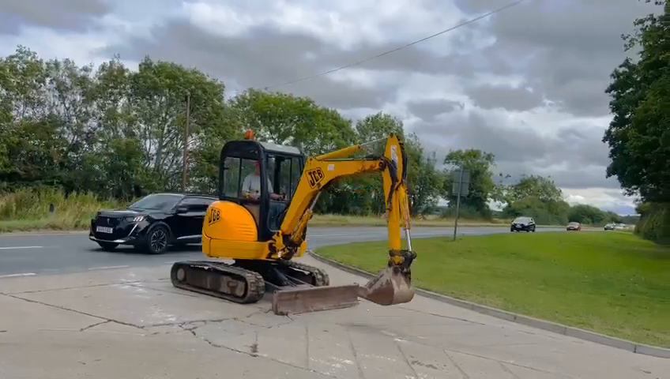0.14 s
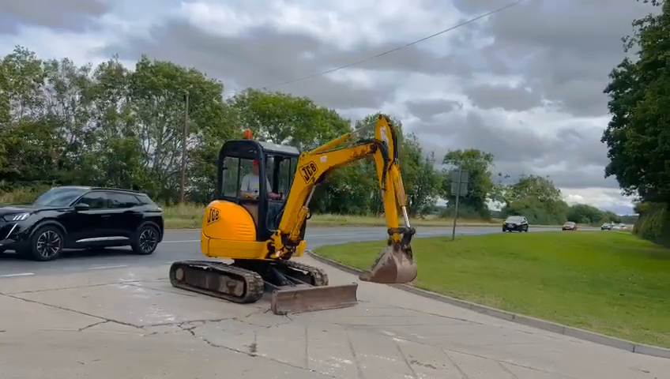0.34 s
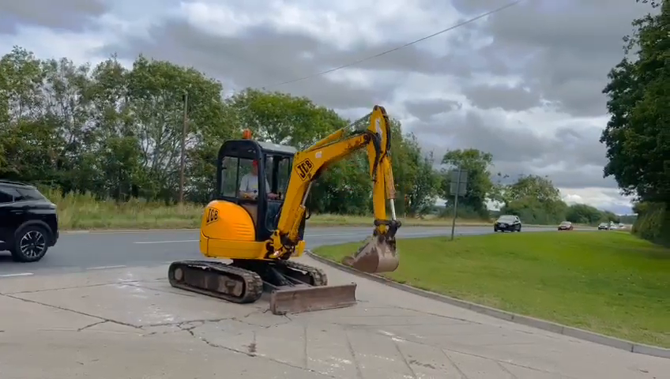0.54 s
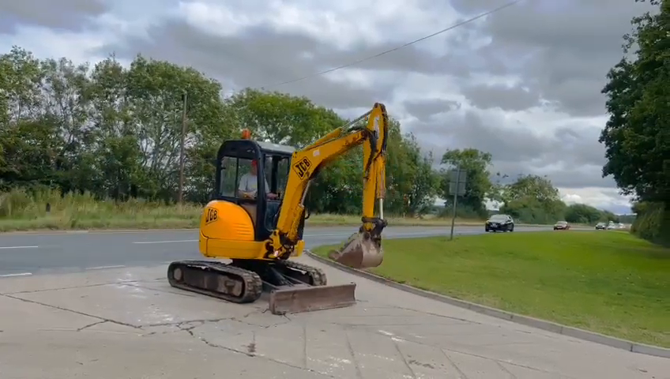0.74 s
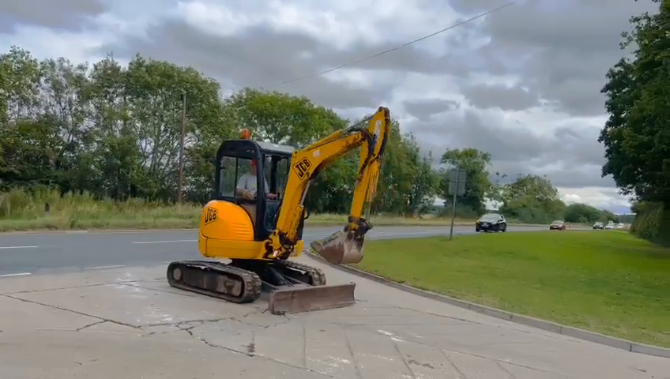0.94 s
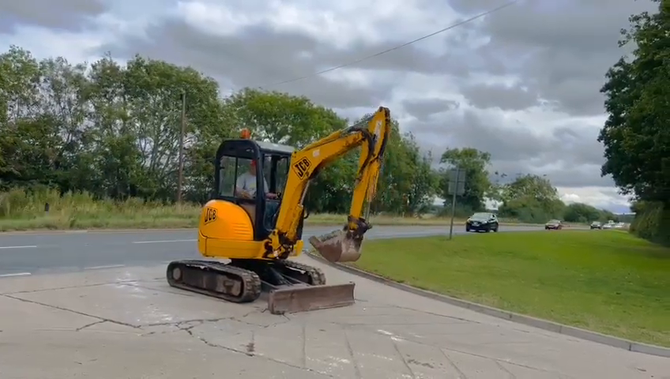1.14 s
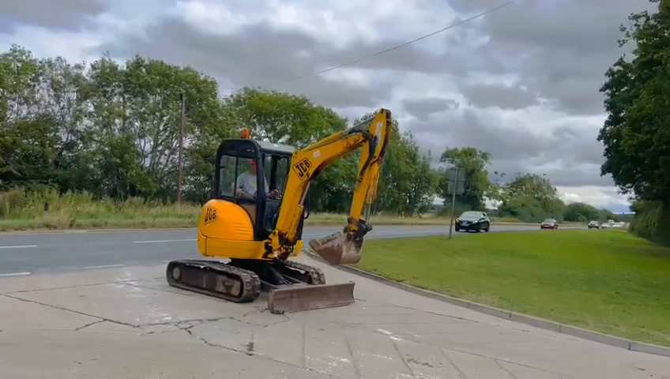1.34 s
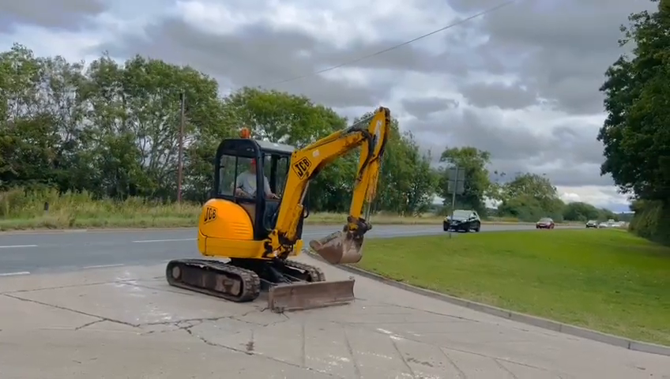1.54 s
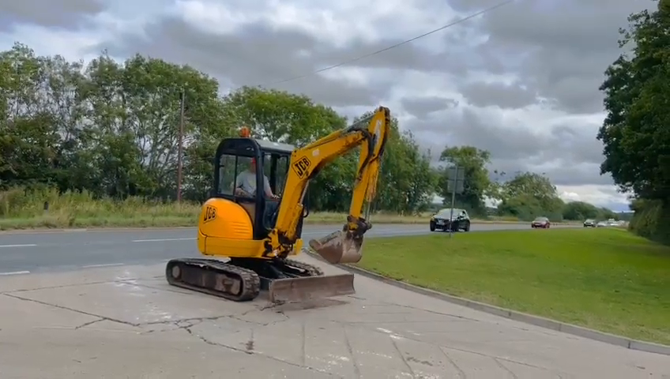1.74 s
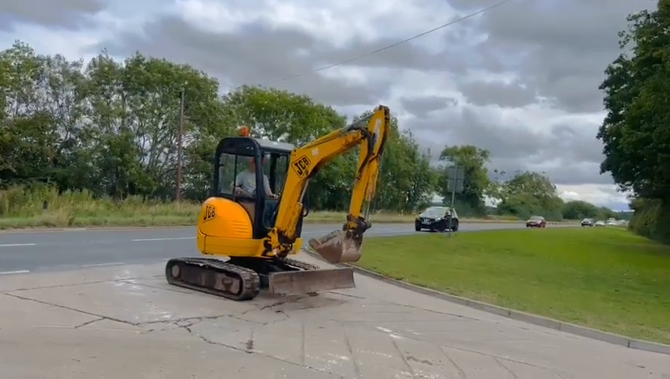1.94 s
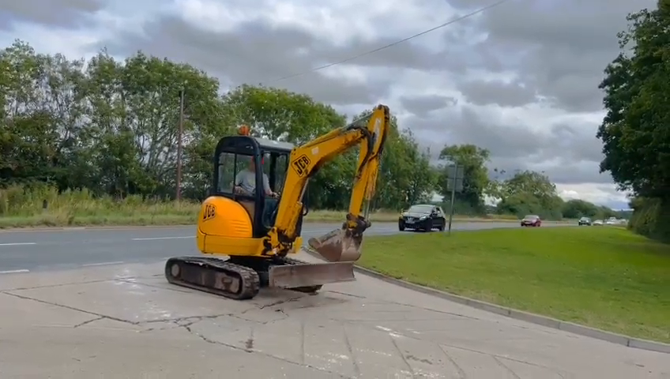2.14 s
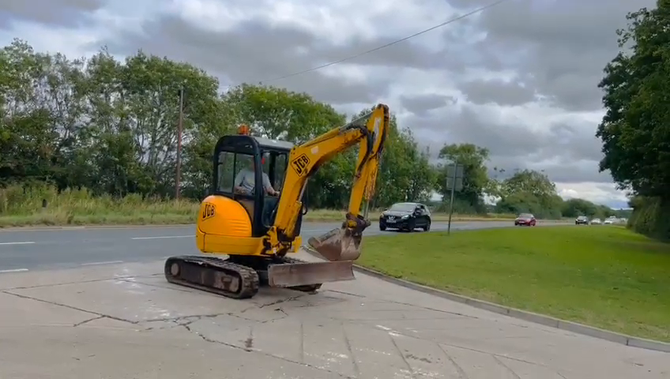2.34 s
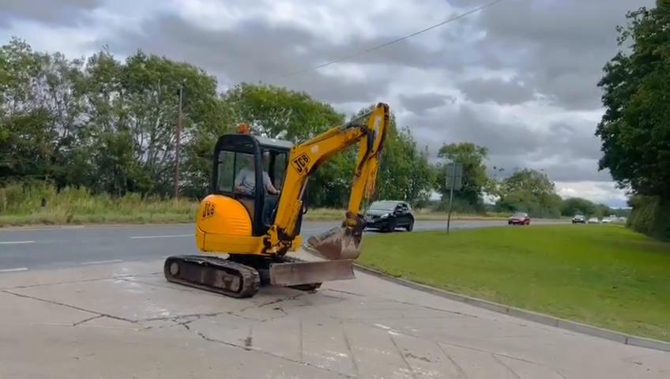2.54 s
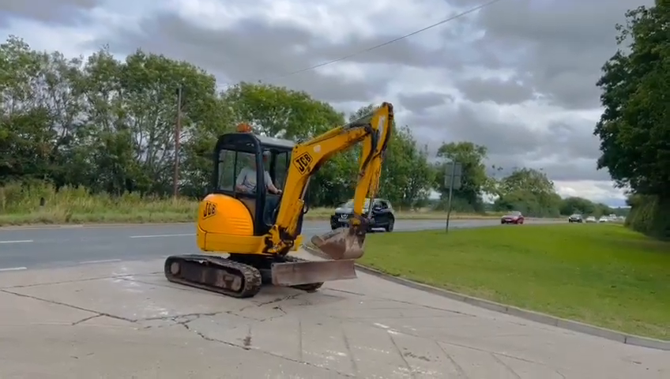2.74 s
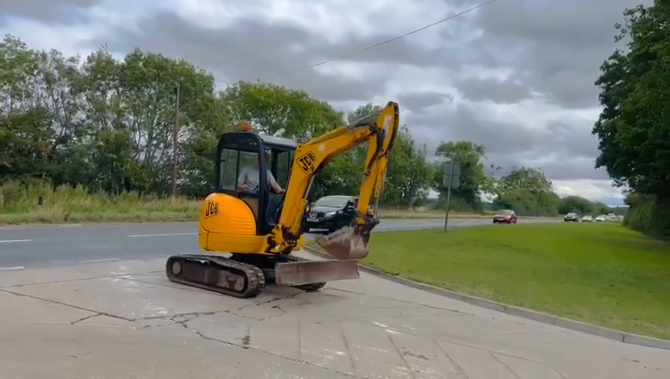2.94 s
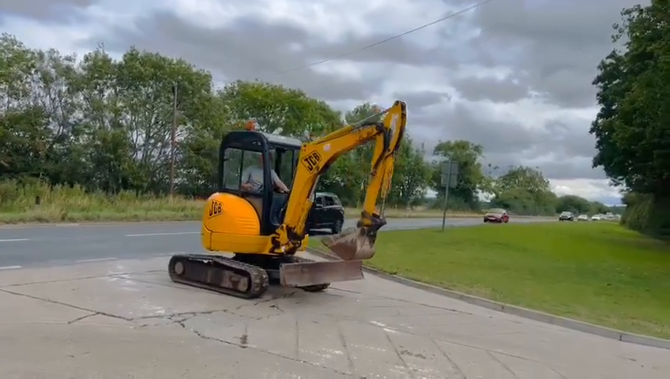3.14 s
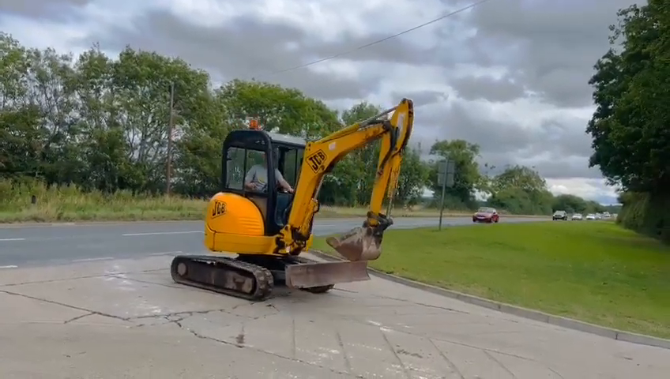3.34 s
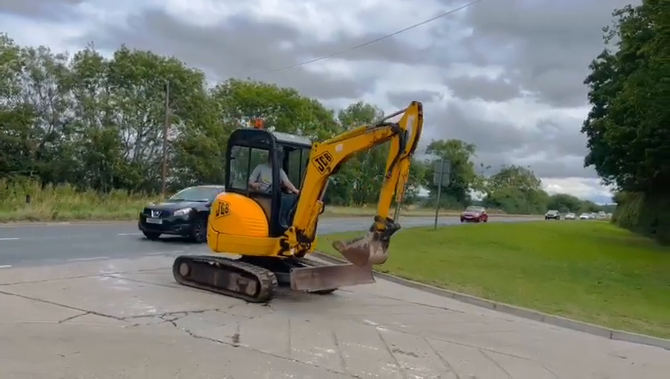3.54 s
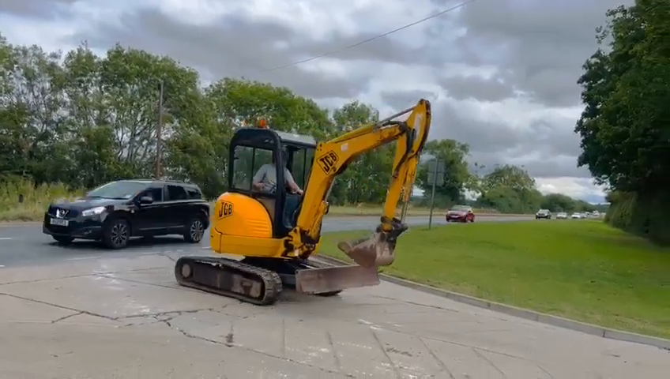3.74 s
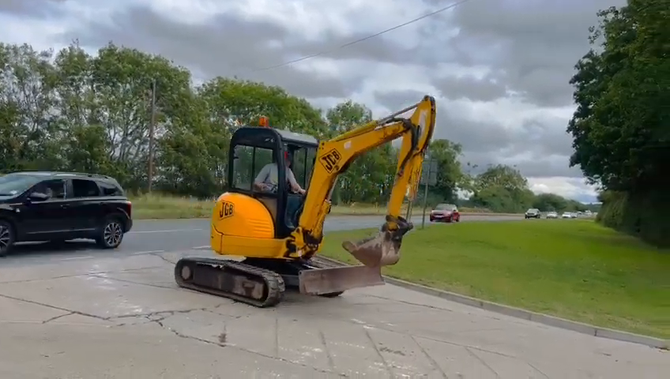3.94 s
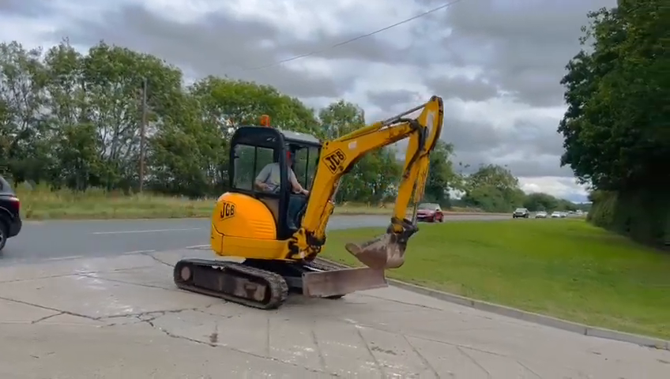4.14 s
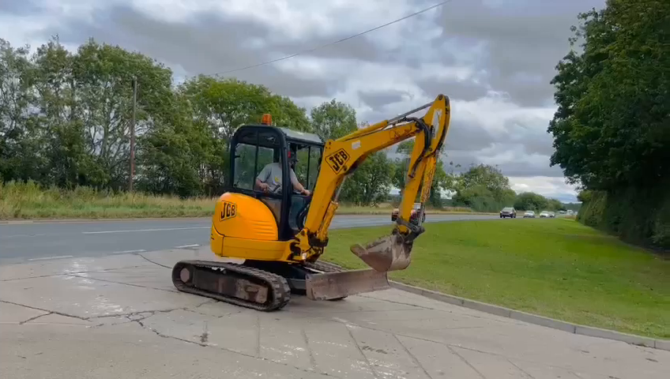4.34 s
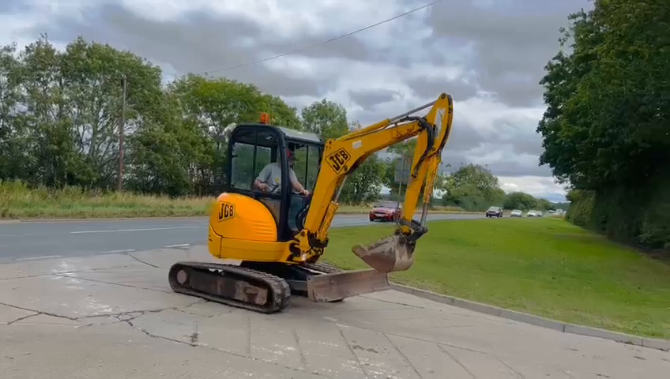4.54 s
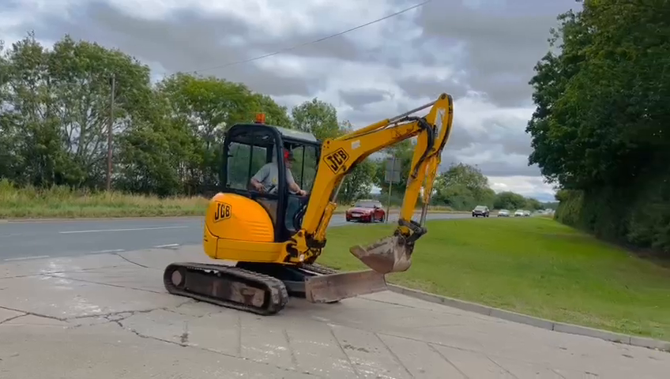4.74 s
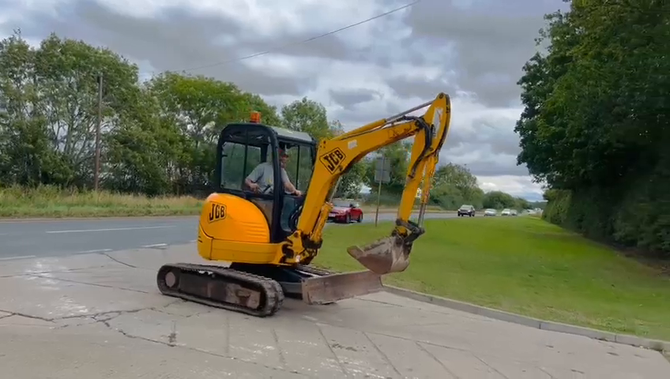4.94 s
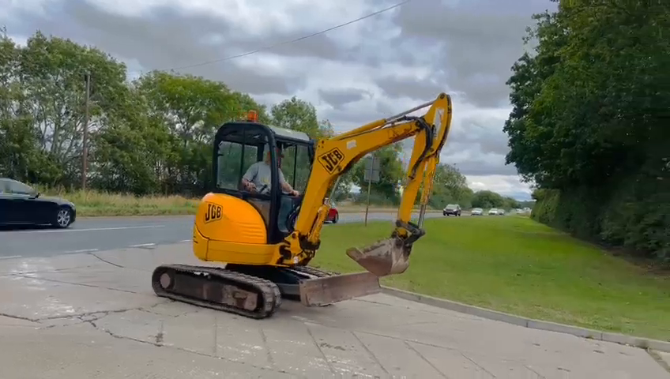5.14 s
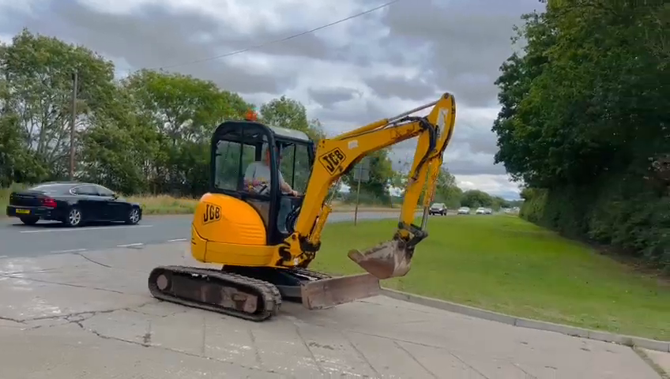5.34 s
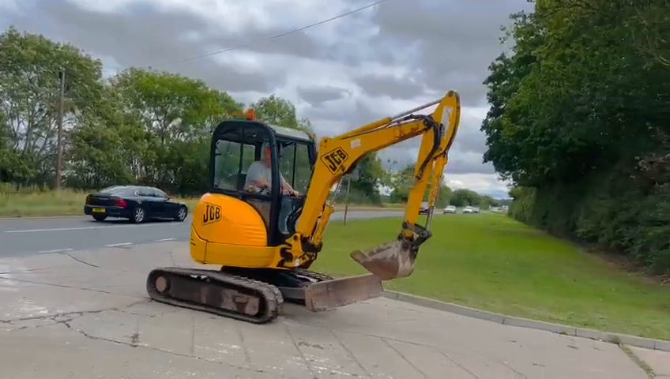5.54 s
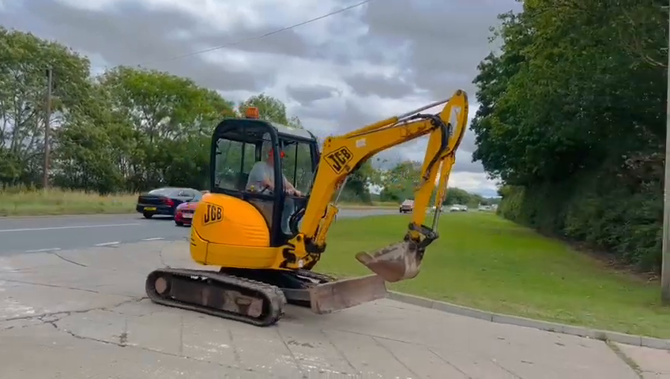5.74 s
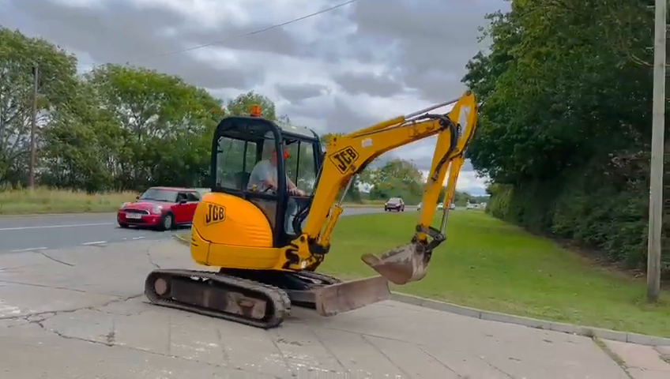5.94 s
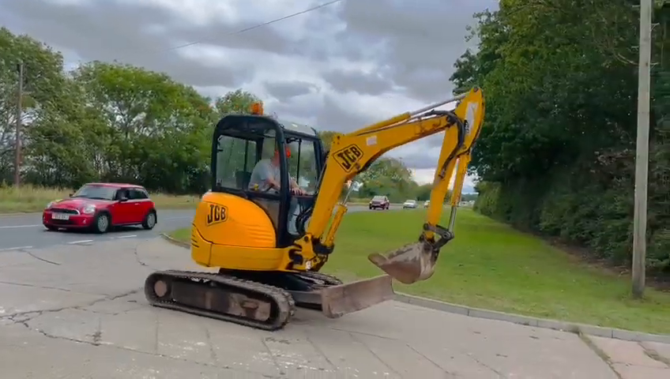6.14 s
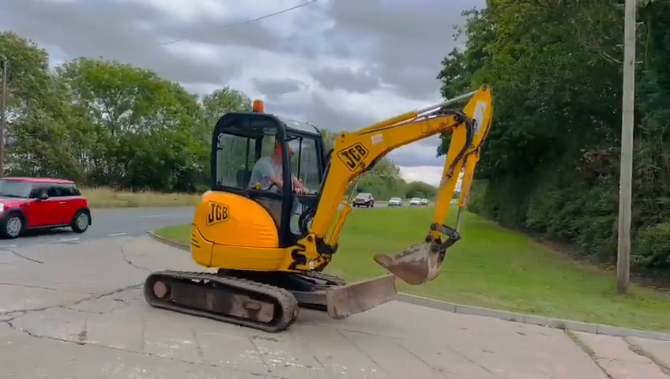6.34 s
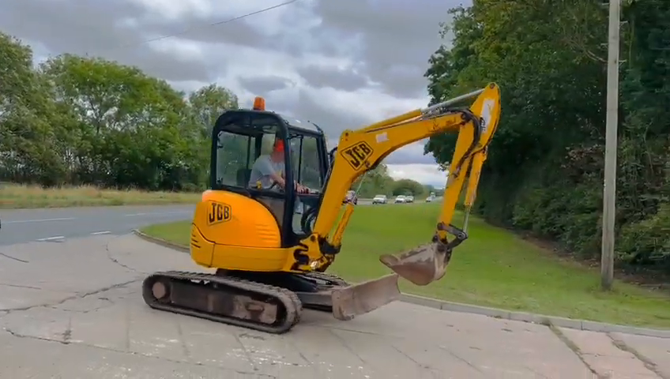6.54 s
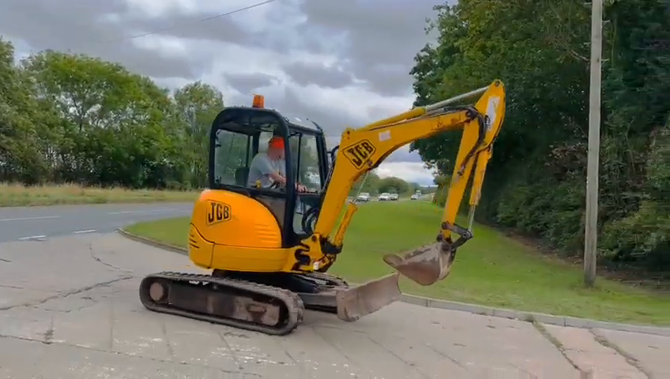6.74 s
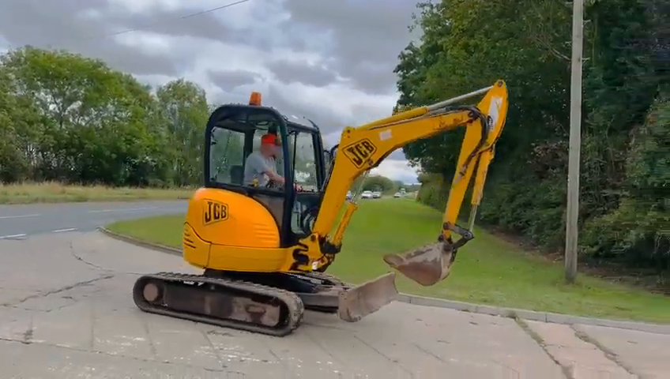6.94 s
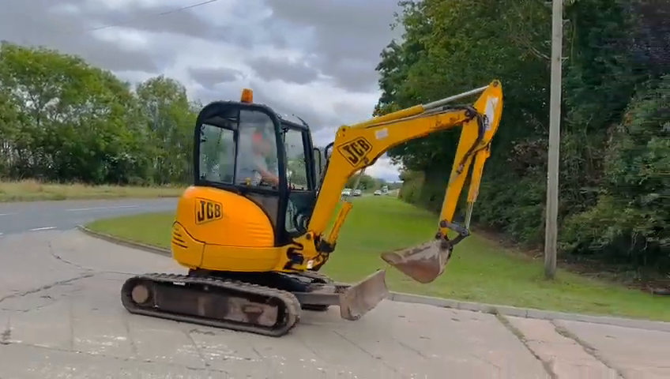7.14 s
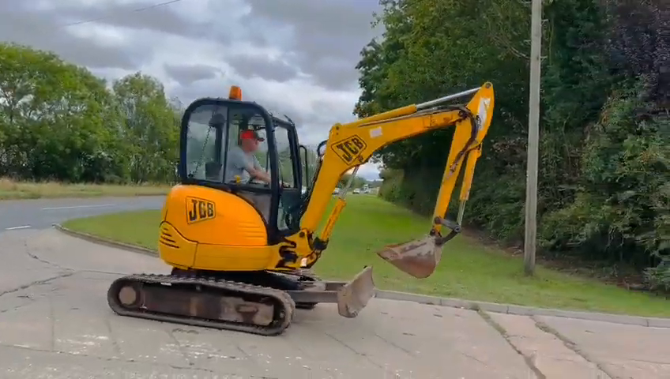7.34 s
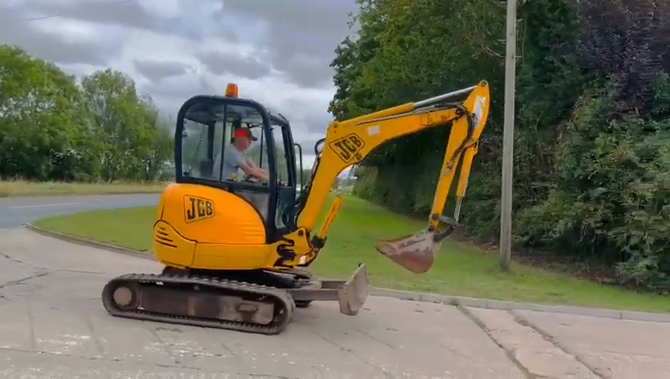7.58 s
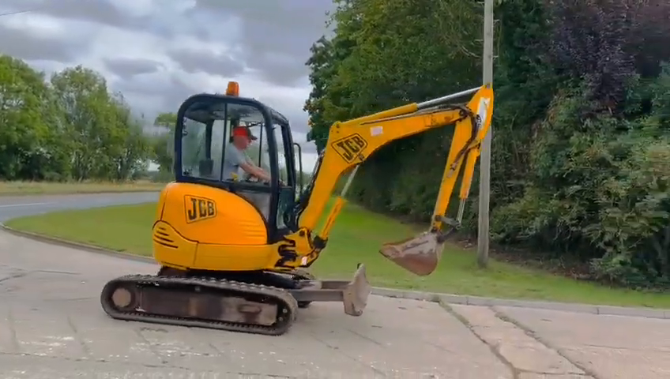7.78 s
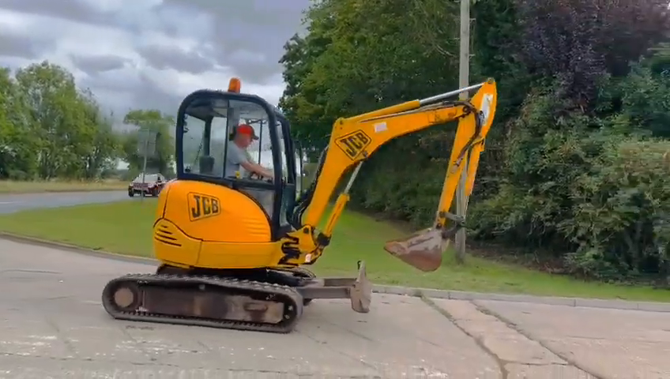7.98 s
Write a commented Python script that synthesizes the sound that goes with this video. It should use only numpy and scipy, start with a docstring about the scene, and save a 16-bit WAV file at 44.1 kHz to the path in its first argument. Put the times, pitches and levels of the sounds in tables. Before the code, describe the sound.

Low buzzing diesel engine with early steel bucket clanks and a booming thud, followed by rapid rattling track links, grinding and a soft traffic rush.

```python
"""Mini excavator on a concrete yard

A three-cylinder diesel drones: exhaust harmonics of the four-stroke cycle over noise from block and shudder.
The swinging bucket clanks (noise impacts and plate modes) and its hollow arm booms (decaying low modes).
The tracks then drive off and grow louder, links knocking over sprocket and rollers in a bed of grinding.
Shaped noise gives the traffic rush behind; a low-pass filter takes off the highest treble."""
import sys
import numpy as np
from scipy import signal
from scipy.fft import rfft, irfft, next_fast_len
from scipy.io import wavfile
from scipy.ndimage import uniform_filter1d

SR = 44100
rng = np.random.default_rng(int(sys.argv[2]) if len(sys.argv) > 2 else 0)


def store_pcm(level_fs):
    """Save levels as 16-bit WAV."""
    pcm = np.round(np.clip(level_fs, -1, 1) * 32767).astype(np.int16)
    wavfile.write(sys.argv[1], SR, np.atleast_2d(pcm).T)


N = 353241
TIME = np.arange(N) / SR
FREQ = np.maximum(np.arange(N + 1) * SR / (2 * N), 1)

# Mean firing rate, surging as the hydraulic load comes and goes: [t/s, f/Hz]
FIRING_RATE = [(0, 57.13), (1.02, 58.4), (1.22, 56.23), (1.42, 59.54), (1.75, 57.5), (2.25, 57.68),
               (2.45, 59.5), (2.7, 57.4), (3.3, 56.78), (4.3, 57.48), (4.6, 59.46), (5.35, 56.72),
               (6.25, 57.9), (6.62, 56.98), (6.88, 58.9), (7.1, 57.64), (7.57, 56.02), (8, 57.35)]
# Exhaust loudness, shifting with speed and load: [t/s, firing tone level/dB, octave level/dB]
DRONE_LEVELS = [(0, -27, -26.5), (0.55, -23.5, -27.5), (1.08, -23.5, -31), (1.23, -30, -28),
                (1.38, -22.5, -31), (2.0, -28, -28.5), (2.8, -24, -30.5), (3.28, -26, -25),
                (3.55, -26.5, -25.5), (4.15, -26, -25), (4.6, -21, -29), (5.15, -24.5, -25.0),
                (5.75, -23.5, -23), (6.3, -23.5, -24), (6.7, -22, -23.5), (6.95, -20, -27.5),
                (7.4, -19, -23.5), (7.6, -22.5, -20.5), (8, -21.5, -22.5)]
# Exhaust harmonics, relative to the drone: [multiple of the four-stroke cycle, level/dB]
EXHAUST_ORDERS = [(2, -24), (3, 3), (4, -22), (5, -21), (6, 3), (7, -18), (8, -12.5), (9, -1.8), (10, -19),
                  (11, -14.5), (12, -9), (14, -18), (15, -23)]
# Spectrum of the engine block's noise: [f/Hz, relative level/dB]
BLOCK_SPECTRUM = [(100, 8.5), (250, 13.5), (370, -0.5), (600, 6.5), (1000, -16.5), (2000, -5), (3000, -18),
                  (5000, -23.5), (8300, -24), (9300, -62)]
# Spectrum of low rumble, of engine and of rollers: [f/Hz, relative level/dB]
RUMBLE_SPECTRUM = [(12, -22.5), (30, -10), (70, 1.5), (140, -3), (235, -1), (300, -12), (420, -17),
                   (900, -81)]

# Driving effort of the tracks: [t/s, relative level/dB]
TRACK_EFFORT = [(0, -75), (2.4, -50.5), (2.8, -45), (3.1, -36), (3.19, -29.5), (3.6, -27), (3.85, -29),
                (4.4, -28), (4.68, -27.5), (4.83, -34), (4.95, -30.5), (5.05, -27.5), (5.95, -26.5),
                (6.25, -24.5), (6.6, -27), (7.1, -26.5), (7.37, -29), (7.65, -26), (8, -26.5)]
# Links passing over the sprocket: [t/s, f/Hz]
LINK_RATE = [(2.5, 15.19), (3.43, 17.06), (3.9, 17.82), (4.74, 16.85), (5.38, 17.51), (5.66, 17.07),
             (6.32, 20.11), (6.86, 17.23), (7.25, 15.14), (8.0, 13.77)]
# Harder jolts as the slack track slaps on its rollers: [t/s, relative level/dB, brightness/dB]
TRACK_JOLTS = [(2.57, -31.5, -9.5), (2.775, -33, -8), (2.823, -28.5, -13), (3.052, -23.5, -5),
               (3.078, -28, -5), (3.147, -24, -5), (3.303, -26.5, -11), (3.44, -25.5, -5),
               (3.602, -17.5, 3), (3.622, -21, 1), (3.675, -22, -2.5), (3.768, -22, 3.5), (3.883, -26, 0.5),
               (3.943, -22.5, 6.5), (4.123, -15.5, -2.5), (4.297, -18, -5), (4.374, -20, -7.5),
               (4.586, -18.5, 0), (4.685, -23, -2.5), (4.871, -19, 0), (5.133, -18, 3.5),
               (5.217, -15.5, -4.5), (5.282, -16.5, 1.5), (5.335, -22, 3.5), (5.395, -19.5, 0.5),
               (5.417, -18, -1), (5.512, -21, 2), (5.569, -20.5, 5), (5.625, -22, 3), (5.676, -19, 3),
               (5.741, -21, 2.5), (5.801, -19.5, 4), (6.088, -13.5, 2.5), (6.126, -16.5, 0.5),
               (6.17, -16, 0), (6.187, -16, -4.5), (6.222, -19.5, 4), (6.262, -20, 7), (6.285, -17.5, -1.5),
               (6.323, -15.5, -3.5), (6.381, -16.5, -1), (6.422, -15.5, 0), (6.445, -19.5, -4.5),
               (6.491, -24, 4), (6.604, -20.5, -4.5), (6.705, -19.5, 0), (6.759, -20, 3.5),
               (6.811, -20.5, 2), (6.866, -18.5, 5), (6.924, -21.5, 5), (7.416, -21.5, 2),
               (7.569, -18, -8.5), (7.647, -17.5, -1.5), (7.719, -17, 3.5), (7.795, -23, 6.5),
               (7.838, -19.5, 2)]
# Resonances of the track frame and its links: [f/Hz, width/Hz, height/dB]
FRAME_MODES = [(508, 48, 8.5), (716, 90, 1), (928, 60, 9), (1400, 130, 6), (1520, 90, 4.5), (1672, 40, 6.5),
               (2330, 280, 3.5), (2790, 150, 6), (6790, 130, 9)]
# Broad spectrum of the track frame: [f/Hz, relative level/dB]
FRAME_SPECTRUM = [(120, -9.5), (250, -4.5), (400, -2), (600, 1), (1000, 3), (1180, -2), (1600, -7.5),
                  (1850, -6.5), (2500, -8.5), (3200, -11.5), (4400, -15.5), (5800, -25), (8800, -32),
                  (11000, -38), (11500, -37)]
# Frequencies around which different steel parts rattle: [f/Hz]
RATTLE_BANDS = [400, 700, 1000, 1500, 2300, 3600, 5500, 8000]
# Link knocks: level over the effort and its scatter, scatter of the brightness (dB)
LINK_DB, LINK_SCATTER_DB, BRIGHT_SCATTER_DB = .5, 1, 1.5
# Unevenness of link timing; a link this close to a jolt makes no knock of its own (s)
LINK_JITTER_S, JOLT_CLEAR_S = .002, .05

# Bucket, arm and blade taking up their play; the seating time adds to the rise:
# [t/s, relative level/dB, brightness/dB, rise/s, strongest ring f/Hz]
BUCKET_CLANKS = [(.035, -25.5, -3, 0.0027, 1592), (.099, -24.5, 9.5, 0.0012, 2040),
                 (.126, -24, -12, 0.0057, 2980), (.159, -35.5, 1, 0.0022, 1275),
                 (.238, -32, 2, 0.0057, 1122), (.26, -42.5, 7, 0.0017, 2400), (.416, -27, 4, 0.008, 2617),
                 (.511, -26, -5.5, .005, 1090), (.528, -32, 9.5, 0.017, 2460), (.559, -28, 4, .004, 2350),
                 (0.575, -29.5, 1, 0.0019, 2940), (.652, -30.5, 0.5, 0.0038, 1346),
                 (.707, -26.5, 5, 0.0062, 2760), (1.052, -21, 2, 0.016, 1430),
                 (1.071, -13, 0.5, 0.0066, 698), (1.107, -26, 13, 0.0034, 1830),
                 (1.135, -23, -9, 0.0083, 726), (1.17, -27, -3.5, .025, 902), (1.203, -29, 5, 0.0063, 2360),
                 (1.226, -23, -2, 0.009, 710), (1.269, -30, 6, .003, 2420), (1.318, -27.5, 4, 0.002, 2534),
                 (1.379, -35, -4, .003, 1720), (1.549, -29, 7.5, 0.0055, 1545),
                 (1.593, -38, 3, 0.0018, 2540), (1.768, -36.5, -6, 0.0072, 1098),
                 (7.49, -19, 2.5, .004, 2796), (7.499, -16.5, -16, 0.0063, 535),
                 (7.514, -34, -13, 0.0036, 1480)]
# Modes of a struck plate: [multiple of its strongest ring, relative level/dB]
PLATE_MODES = [(1, 1), (1.75, -13.5), (2.021, -15.5), (3.68, -18)]
# Resonances of the bucket: [f/Hz, width/Hz, height/dB]
BUCKET_MODES = [(527, 9.6, 7), (738, 164, 8.5), (902, 52, 10), (1190, 44, 6), (2800, 420, 2), (3740, 55, 4),
                (5260, 100, 7.5), (6500, 230, 3.5), (7400, 260, 1.5)]
# Broad spectrum of the bucket: [f/Hz, relative level/dB]
BUCKET_SPECTRUM = [(120, 3.5), (300, 6), (800, 0), (1500, 0.5), (2500, 0), (3500, -3), (5500, -13.5),
                   (7500, -12), (11000, -29), (11600, -32.5)]
# Decay of a clank (s); a pin scrapes for the seating time before it seats (s)
CLANK_T60_S, SEATING_S = 0.16, 0.0014
# Level of the plate modes against the clank, before the modes' own levels (dB)
RING_DB = -7.5

# Blows that set the arm booming: [t/s, level/dB, push/s, share of the free ring time]
ARM_BLOWS = [(.058, -13, 0.0061, 0.61), (.111, -11.5, 0.0058, 0.46), (1.073, -3.5, 0.017, 0.78),
             (1.158, -15, 0.02, 0.84)]
# Modes of the freely ringing arm: [f/Hz, relative level/dB, t60/s]
ARM_MODES = [(209.4, 10.5, 0.16), (221.7, -12, 0.72), (243, -6, 1)]

# Rush of car tyres and working hydraulics, before a slight random waver: [t/s, level/dB]
RUSH_LEVEL = [(0, -36.5), (.6, -36.5), (.95, -37.5), (1.4, -42), (1.9, -45), (2.4, -51), (3, -36.5),
              (3.8, -33.5), (5, -32), (6.2, -32), (8, -35.5)]
# Spectrum of the rush: [f/Hz, relative level/dB]
ROAD_SPECTRUM = [(100, 16), (400, -1.5), (700, 6.5), (950, 7.5), (1400, -0.5), (2400, -7.5), (3300, -20),
                 (5000, -32), (8300, -22.5), (9300, -64.5)]

# Full difference between two microphone ports: [f/Hz, left minus right level/dB, left lead/rad]
PORT_DIFFERENCE = [(300, 0, 0), (550, -1.5, 0), (720, -12, 0), (820, -5, 1.2), (1100, -1, .9),
                   (1350, -4, .1), (1750, -6, .2), (1900, 0, 1.6), (2200, -4, .2), (2600, -1, 2),
                   (3400, 5, 2.2), (4400, 0, .3), (6500, 0, 0)]
# Over this range the left port comes to lag by this phase, nearly opposite (Hz; rad)
FLIP_HZ, FLIP_RAD = (8000, 9200), 2.6
TOP_HZ = 12400


def engine():
    """Harmonic synthesis: three unequal firings a cycle drone in the exhaust; each also knocks in the block."""
    firings = np.cumsum(curve(FIRING_RATE) * (1 + 0.0063 * walk(40))) / SR
    cycle_phase = 2 * np.pi * firings / 3
    levels = np.array(DRONE_LEVELS)
    tone_db, octave_db = curve(levels[:, :2]), curve(levels[:, ::2])
    drone_db = (tone_db + octave_db) / 2
    exhaust = 0
    for order, db in EXHAUST_ORDERS:
        # lines between the firing harmonics come from uneven combustion and waver more
        if order % 3:
            waver_db, lag = 2.5, rng.uniform(0, 2 * np.pi)
        else:
            waver_db, lag = .8, 0
        level_db = {3: tone_db, 6: octave_db}.get(order, drone_db)
        gain = undb(level_db + db + waver_db * walk(8.1))
        exhaust = exhaust + gain * np.sin(order * cycle_phase + lag)
    # no two strokes burn equally hard
    exhaust = exhaust * undb(.55 * walk(57))
    knock = unit(2.1 + np.exp(-(firings % 1) / 0.16)) * undb(2.0 * walk(57))
    block = shape(pair(side_db=-4.5) * knock, colour(BLOCK_SPECTRUM))
    shudder = shape(pair(side_db=2.5), colour(RUMBLE_SPECTRUM))
    return exhaust + undb(drone_db) * (undb(-18.0) * block + undb(-7.5) * shudder)


def tracks(rise=0.0081, body_t60=0.12, edge_t60=0.15, knock_db=-5.0, edge_db=-1.0,
           grind_db=-2.5, grit_db=1.4, rumble_db=-2.0, ring_db=-9, ring_t60=0.14):
    """Impact excitation of a resonator: links knock into the frame over grinding; rollers rumble on concrete."""
    effort = undb(curve(TRACK_EFFORT))
    # powers of the low and high parts of the clatter, beginning with the grinding
    body = (effort * undb(grind_db + 1.57 * walk(90))) ** 2
    edge = (effort * undb(grind_db + grit_db + 2.6 * walk(110))) ** 2
    rings = np.zeros(N)
    for s, db, bright_db in TRACK_JOLTS + link_knocks():
        start, low = blow(s - rise / 3, rise, body_t60)
        add(body, start, (undb(db + knock_db) * low) ** 2)
        start, high = blow(s - rise / 3, rise, edge_t60)
        add(edge, start, (undb(db + bright_db + edge_db) * high) ** 2)
        # each link lands on another spot and favours two of the frame's low modes
        start, fade = blow(s, 0.0044, ring_t60)
        for mode in rng.choice(6, 2, replace=False, p=[.1, .08, .27, .15, .2, .2]):
            hz, width, _ = FRAME_MODES[mode]
            tone = ring(hz, width / hz, count=2) / np.sqrt(2)
            add(rings, start, undb(db + ring_db) * fade * tone)
    steel = causal(unit(colour(FRAME_SPECTRUM, FRAME_MODES) * plates(ripple_db=3.5)))
    clatter = chatter(body, edge, steel, grain_db=1.5, flicker_db=2.5, side_db=-8.0, split_hz=2460)
    rumble = shape(pair(side_db=-7.0) * effort * undb(walk(15)), colour(RUMBLE_SPECTRUM))
    taps = pin_taps(np.sqrt(body))
    return at_ports(clatter + rings + taps, amount=0.89) + undb(rumble_db) * rumble


def link_knocks():
    """Periodic impacts: one per link meeting the sprocket, harder and brighter with effort: t/s, level/dB, dB."""
    passed = np.cumsum(curve(LINK_RATE)) / SR
    at = np.flatnonzero(np.diff(np.floor(passed)))
    late, hard, bright = rng.standard_normal((len(at), 3)).T
    effort_db = curve(TRACK_EFFORT)
    db = effort_db[at] + LINK_DB + LINK_SCATTER_DB * hard
    # gentler knocks are duller by one dB per dB under full effort
    bright_db = effort_db[at] - effort_db.max() + BRIGHT_SCATTER_DB * bright
    distance = np.abs(TIME[at, None] - np.array(TRACK_JOLTS)[:, 0]).min(axis=1)
    knocks = np.column_stack([TIME[at] + LINK_JITTER_S * late, db, bright_db])
    return list(knocks[distance > JOLT_CLEAR_S])


def pin_taps(shaking, tap_t60=0.058, scatter_db=1.5, count=1700):
    """Modal impulse response: loose pins and flanges tap the frame as it shakes, each ringing one mode."""
    age, out = TIME[:SR // 8], np.zeros(N)
    starts = rng.integers(0, N, count)
    modes = rng.choice(7, count, p=[.06, .08, .32, .15, .15, .16, .08])
    for start, mode, (detune, size) in zip(starts, modes, rng.standard_normal((count, 2))):
        hz, width, _ = FRAME_MODES[mode]
        tone = np.sin(2 * np.pi * (hz + detune * width / 2) * age)
        tap = tone * np.exp(-np.log(1000) * age / tap_t60)
        add(out, start, shaking[start] * undb(scatter_db * size) * tap)
    return out


def bucket(edge_share=0.57, yard_db=-17, yard_t60=1.0):
    """Damped plate modes: steel clanks on its pins, treble dying first, and the yard reverberates faintly."""
    body, edge, rings = np.zeros((3, N))
    for s, db, bright_db, rise, ring_hz in BUCKET_CLANKS:
        rise = rise + SEATING_S
        start, low = blow(s, rise, CLANK_T60_S)
        add(body, start, (undb(db) * low) ** 2)
        for multiple, mode_db in PLATE_MODES:
            # bright blows bring out the upper modes
            ring_db = db + RING_DB + mode_db + bright_db * (multiple > 1) * 0.24
            tone = ring(ring_hz * multiple, spread=0.05, count=6)
            add(rings, start, undb(ring_db) * low * tone)
        start, high = blow(s, rise, CLANK_T60_S * edge_share)
        add(edge, start, (undb(db + bright_db) * high) ** 2)
        start, echo = blow(s, 0.059, yard_t60)
        add(body, start, (undb(db + yard_db) * echo) ** 2)
        add(edge, start, (undb(db + yard_db - 4.5) * echo) ** 2)
    steel = causal(colour(BUCKET_SPECTRUM, BUCKET_MODES))
    clanks = chatter(body, edge, steel, grain_db=1.0, flicker_db=1.5, side_db=-4.5, split_hz=1900)
    return at_ports(clanks + rings, amount=0.66)


def arm():
    """Damped free vibration: heavy blows ring the hollow arm's low modes; a pin held tight damps them sooner."""
    age = TIME[:SR]
    out = np.zeros(N)
    for s, db, push, free in ARM_BLOWS:
        modes = 0
        for hz, mode_db, t60 in ARM_MODES:
            decay = undb(mode_db - 60 * age / (t60 * free))
            modes = modes + decay * np.sin(2 * np.pi * hz * age)
        onset = 1 - np.exp(-(age / push) ** 2)
        add(out, int(s * SR), undb(db) * modes * onset)
    return out


def traffic():
    """Broadband tyre noise: a wide rush that swells as cars go by."""
    level = undb(curve(RUSH_LEVEL) + 0.5 * walk(5.8))
    return shape(pair(side_db=4.5) * level, colour(ROAD_SPECTRUM))


def chatter(body, edge, gain, grain_db, flicker_db, side_db, split_hz):
    """Dense micro-impacts: loose steel meets as noise; body and edge are the powers of low and high parts."""
    impacts = pair(side_db) * unit(undb(grain_db * walk(700)))
    out = 0
    for hz, band in zip(RATTLE_BANDS, np.eye(len(RATTLE_BANDS))):
        high = 1 / (1 + (split_hz / hz) ** 4)
        # each part rattles by its own chance, so no two contacts have the same colour
        flicker = unit(undb(flicker_db * walk(70)))
        level = np.sqrt(body * (1 - high) + edge * high) * flicker
        band_gain = np.interp(np.log(FREQ), np.log(RATTLE_BANDS), band)
        out = out + shape(impacts * level, gain * band_gain)
    return out


def ring(hz, spread, count=4):
    """Beating: a cluster of close modes interferes; rms near 1."""
    detune, phase = rng.uniform(-0.99, 1, (2, count, 1))
    tones = np.sin(2 * np.pi * hz * (1 + spread * detune) * TIME[:SR // 2] + np.pi * phase)
    return tones.sum(0) * np.sqrt(2 / count)


def plates(ripple_db, spacing_hz=24):
    """Modal density: the many narrow resonances of welded plates ripple the gain per frequency."""
    hz = np.arange(0, SR / 2, spacing_hz)
    ripple = np.interp(FREQ, hz, rng.uniform(-1.3, 1, len(hz)))
    return unit(undb(ripple_db * ripple))


def blow(start, rise, t60):
    """Attack and exponential decay: start sample and envelope of one contact building up and ringing out."""
    age = TIME[:SR // 2]
    rise = max(rise, 1e-4)
    decay = np.exp(-np.log(1000) * np.maximum(age - rise, 0) / t60)
    return int(start * SR), np.minimum(age / rise, 1) * decay


def at_ports(x, amount):
    """Diffraction and path difference: level and phase differ between the two ports by frequency."""
    hz, db, lead = np.transpose(PORT_DIFFERENCE)
    db = amount * np.interp(np.log(FREQ), np.log(hz), db)
    lead = amount * np.interp(np.log(FREQ), np.log(hz), lead)
    lead = lead - np.interp(FREQ, FLIP_HZ, (0, FLIP_RAD))
    # each port takes half of the difference
    tilt = undb(db / 2) * np.exp(.5j * lead)
    return np.array([shape(x[0], tilt), shape(x[1], 1 / tilt)])


def pair(side_db, wide_hz=1200, narrow_hz=6500):
    """Interchannel coherence: left and right noise, alike in bass and highest treble, less so between."""
    mid, side = rng.standard_normal((2, N))
    width = FREQ / (FREQ + wide_hz) / (1 + (FREQ / narrow_hz) ** 4)
    side = undb(side_db) * shape(side, width)
    return mid + np.array([side, -side])


def colour(points, modes=()):
    """Resonance: gain per frequency of unit power, a broad slope with Lorentzian humps in dB."""
    hz, db = np.transpose(points)
    db = np.interp(np.log(FREQ), np.log(hz), db)
    for centre, width, height in modes:
        db = db + height / (1 + (2 * (FREQ - centre) / width) ** 2)
    return unit(undb(db))


def causal(gain):
    """Minimum phase: the same gain per frequency, phased so that resonances ring after a blow."""
    cepstrum = irfft(np.log(gain))
    folded = np.r_[cepstrum[0], 2 * cepstrum[1:N], np.zeros(N)]
    return np.exp(rfft(folded))


def shape(x, gain):
    """Linear filtering: multiply the spectrum by a gain per frequency."""
    size = next_fast_len(N + 8192, True)
    gain = np.interp(np.arange(size // 2 + 1) * SR / size, FREQ, gain)
    return irfft(rfft(x, size) * gain, size)[..., :N]


def walk(rate):
    """Random modulation: chance levels held 1 / rate s and slewed, of rms 1."""
    hold = max(int(SR / rate), 1)
    steps = np.repeat(rng.standard_normal(N // hold + 1), hold)[:N]
    return unit(uniform_filter1d(steps, hold))


def curve(rows):
    """Linear interpolation: join (t/s, value) rows with straight lines."""
    return np.interp(TIME, *np.transpose(rows))


def add(track, start, sound):
    """Superposition: mix a sound into a track from a sample on."""
    start = max(start, 0)
    track[start:start + len(sound)] += sound[:max(N - start, 0)]


def undb(db):
    """Logarithmic level: decibels to amplitude gain."""
    return 10 ** (np.asarray(db) / 20)


def unit(x):
    """Normalisation: scale to rms 1."""
    return x / np.sqrt(np.mean(x ** 2))


def scene():
    """Superposition of sources: the machine in front of the road."""
    return engine() + tracks() + bucket() + arm() + traffic()


def record(dry):
    """Band limiting: an elliptic low-pass cuts the top."""
    return signal.sosfilt(signal.ellip(8, .2, 80, TOP_HZ, fs=SR, output="sos"), dry)


dry = scene()
out = record(dry)
store_pcm(out)
```